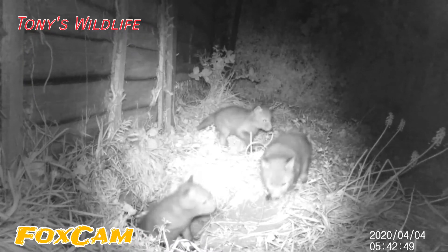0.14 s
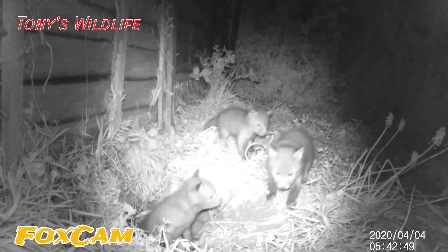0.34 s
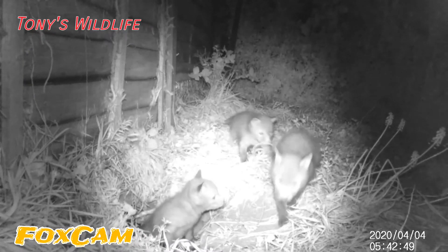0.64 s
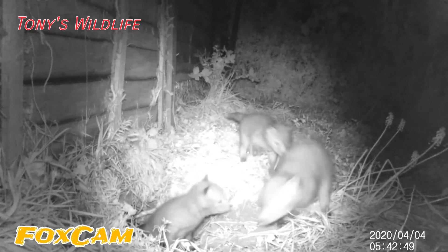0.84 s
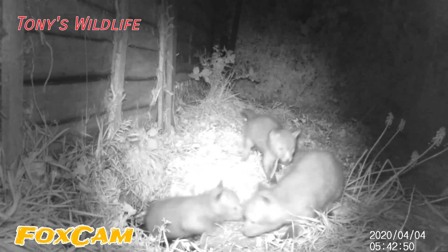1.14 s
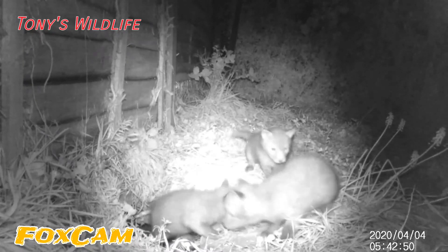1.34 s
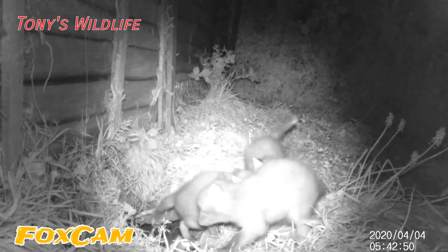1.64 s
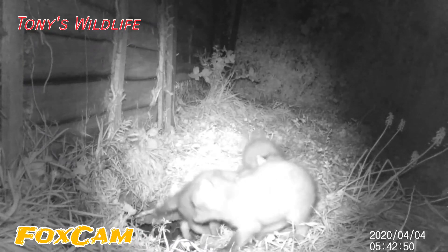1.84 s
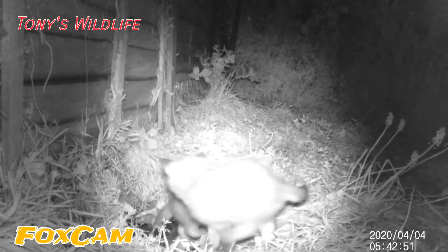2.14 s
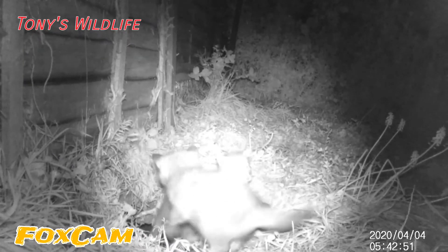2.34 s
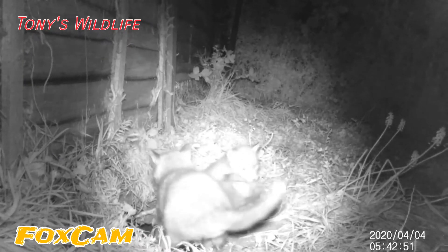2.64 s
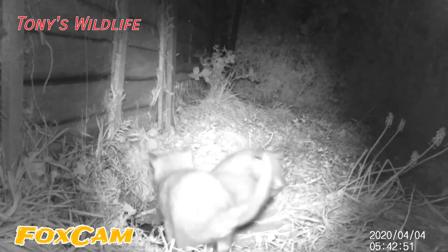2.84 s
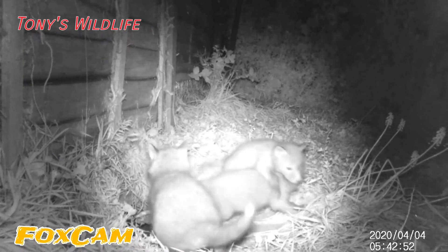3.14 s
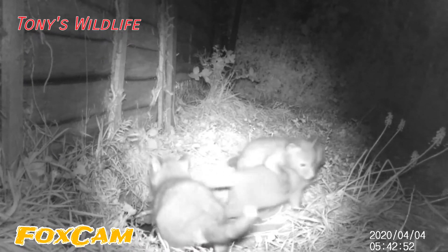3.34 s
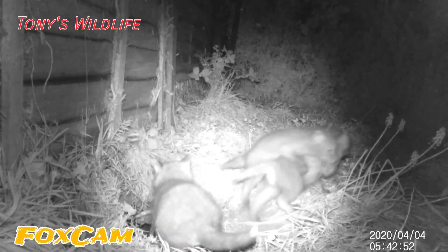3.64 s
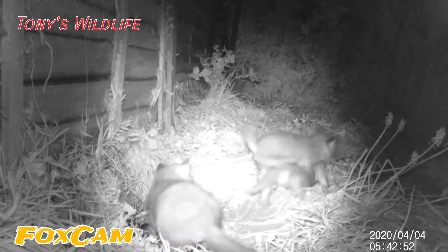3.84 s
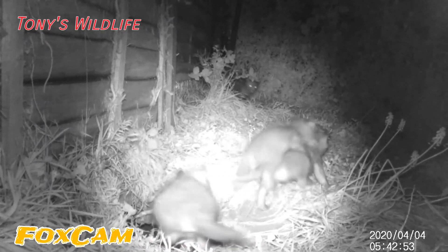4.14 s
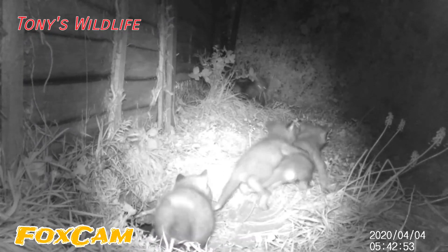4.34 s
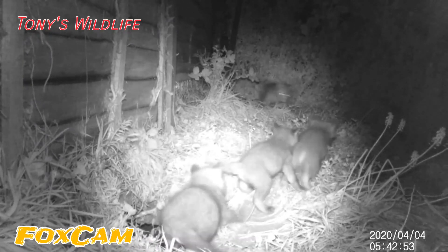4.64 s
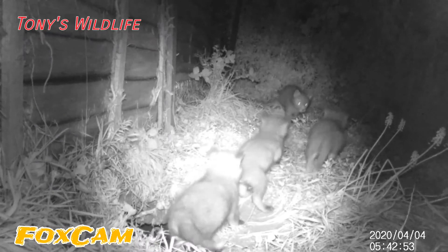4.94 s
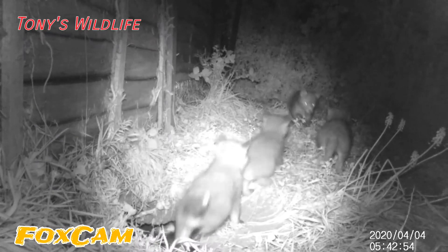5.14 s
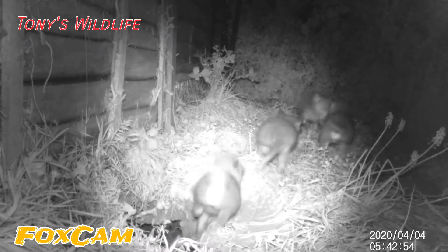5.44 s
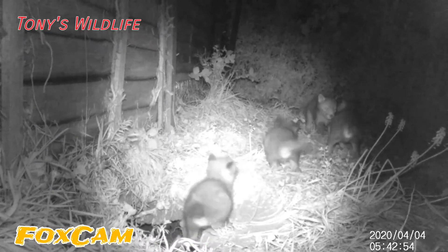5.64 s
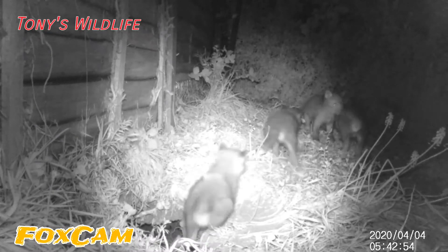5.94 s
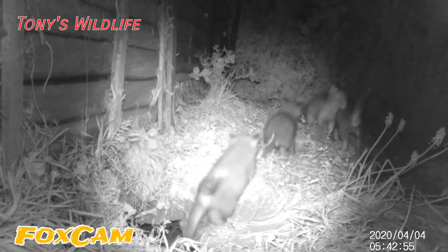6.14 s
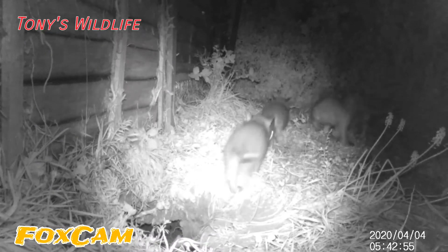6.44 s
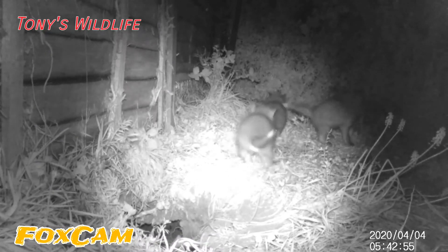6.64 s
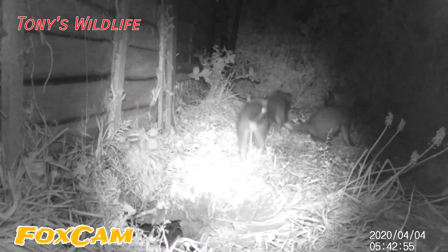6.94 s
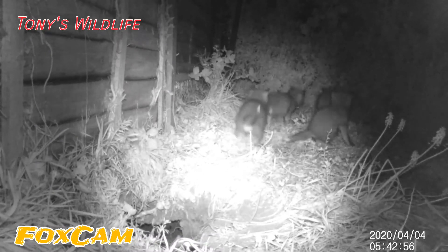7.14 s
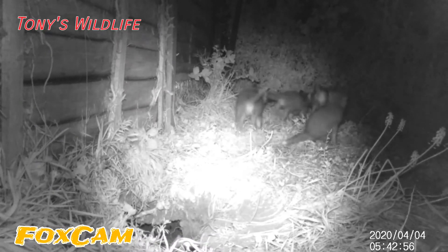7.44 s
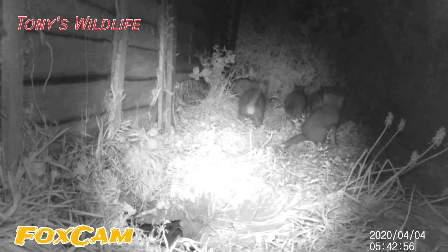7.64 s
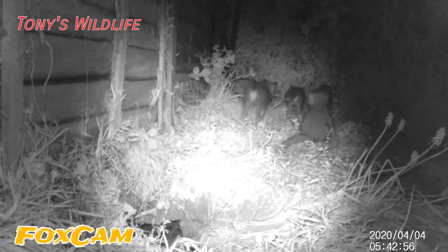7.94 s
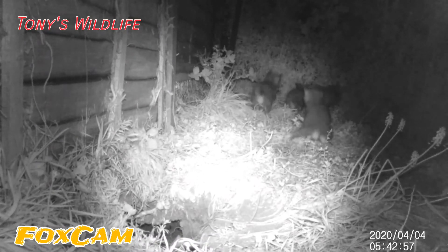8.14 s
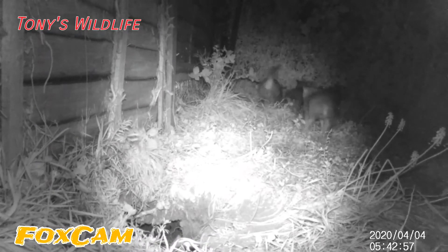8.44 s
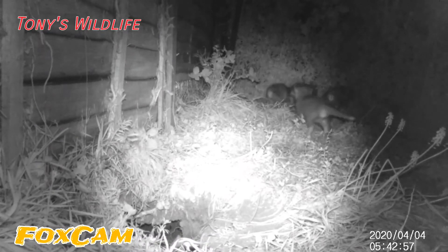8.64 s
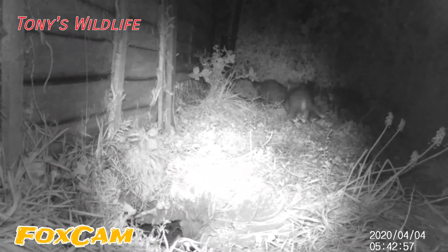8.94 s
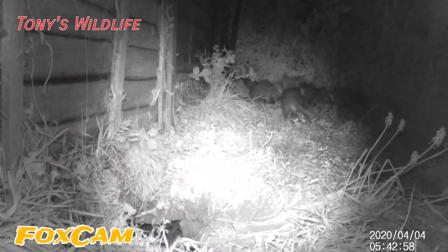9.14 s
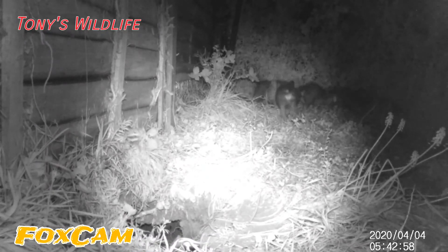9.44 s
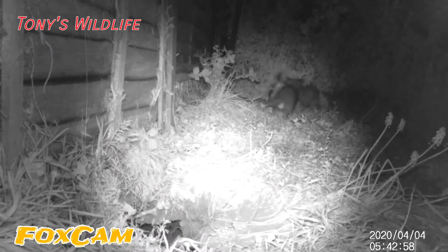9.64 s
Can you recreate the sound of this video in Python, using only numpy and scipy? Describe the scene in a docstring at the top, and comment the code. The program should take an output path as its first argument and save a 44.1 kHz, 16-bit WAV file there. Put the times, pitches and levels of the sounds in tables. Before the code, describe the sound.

Faint echoing birdsong at dawn, a clear trill early on, twig snaps, then piercing close chirps and warbles, recorded on a small rough outdoor microphone.

```python
"""Dawn chorus in a garden.

A songbird close by whistles with both sides of its syrinx as gliding sines; a thrush flutes lower and farther off.
Small birds whistle, trill and rattle; noise modulation makes notes hoarse, and many faint whistles form a chorus.
Twigs snap as decaying sines over filtered-noise straw, traffic and hiss; noise tails echo off hedges and fences.
A small outdoor camera samples slowly, cuts steeply above 5.25 kHz, and its playback gain bends the peaks."""
import sys
import numpy as np
from scipy import signal
from scipy.fft import rfft, irfft, next_fast_len
from scipy.io import wavfile
from scipy.ndimage import uniform_filter1d, map_coordinates

SR = 44100
rng = np.random.default_rng(int(sys.argv[2]) if len(sys.argv) > 2 else 0)


def transcribe(signal):
    """Save signal, clipped to [-1, 1], as a 16-bit WAV file at the path in sys.argv[1]."""
    frames = np.atleast_2d(signal).T
    limited = np.clip(frames, -1, 1)
    pcm = np.round(limited * 32767).astype(np.int16)
    wavfile.write(sys.argv[1], SR, pcm)


N = 431738  # samples

# Near singer, one glide a row; overlapping rows are the two sides of its syrinx:
# t/s, length/s, first f/Hz, middle f/Hz, last f/Hz, level/dB, swell start to end/dB
NEAR_NOTES = [ (5.2, 0.026, 5440, 5200, 4640, -22, 8.5), (5.228, .037, 4315, 4016, 4200, -13, -6),
              (5.266, 0.015, 4170, 4030, 3580, -17, 7), (5.279, 0.011, 3750, 3433, 3340, -8.5, -8.5),
              (5.343, .044, 4905, 4494, 4750, -7, 11), (5.387, 0.012, 4420, 3910, 3650, -4.5, -1.5),
              (5.396, 0.034, 3715, 3423, 3294, -4, -5), (5.478, 0.0073, 4720, 4340, 4100, -17, 6.5),
              (5.486, .043, 4136, 4070, 3950, -8.5, -16.5), (5.526, 0.026, 3930, 3900, 3890, -10, 0),
              (5.569, 0.033, 4080, 3460, 3680, -11, 0.5), (5.602, 0.17, 3810, 3733, 3670, -28, 0),
              (6.038, .052, 3460, 3400, 3390, -22.5, 0), (6.09, 0.11, 3376, 3430, 3400, -21.5, 2.5),
              (6.222, .016, 3430, 3360, 3190, -28.5, 0), (6.3, 0.12, 3483, 3420, 3415, -21, -3.5),
              (6.424, .016, 3410, 3330, 3170, -30.5, 0), (6.62, 0.016, 3900, 3685, 3520, -10.5, 20),
              (6.634, 0.0097, 3970, 4080, 4280, -9.5, -5.5), (6.644, 0.021, 3465, 3615, 3420, -9.5, -1.5),
              (6.648, 0.012, 4290, 4450, 4430, -9, 5.5), (6.666, 0.015, 4290, 4250, 4220, -14.5, -9.5),
              (6.661, 0.026, 3500, 3420, 3830, -15, 7), (6.682, 0.019, 3924, 3690, 3680, -4, -6),
              (6.718, 0.023, 3810, 3650, 3470, -8.5, 5), (6.744, .062, 3380, 3410, 3620, -12.5, 0),
              (6.747, 0.066, 4290, 4040, 4150, -10.5, -6), (6.805, 0.037, 3820, 3607, 3720, -12.5, -7.5),
              (7.092, 0.027, 3380, 3970, 4210, -12.5, 11), (7.11, 0.035, 2800, 3410, 4020, -12, 28),
              (7.142, 0.015, 3630, 3730, 4470, -8, -9), (7.198, .017, 2920, 3170, 3520, -16.5, 11),
              (7.211, 0.03, 3345, 3510, 3120, 0, -12.5), (7.246, 0.0082, 3370, 2975, 2830, -23, -9),
              (7.309, 0.013, 3990, 4105, 4310, -12.5, 6.5), (7.313, .028, 2740, 3406, 3710, -12, 25),
              (7.341, 0.036, 3880, 3750, 3675, -10, 1.5), (7.428, 0.017, 3770, 4150, 4440, -14.5, -2),
              (7.434, 0.037, 2850, 3544, 4190, -8.5, 24.5), (7.468, 0.03, 3974, 4044, 4120, -9, 3.5),
              (7.49, .011, 4370, 4600, 4840, -9.5, -5.5), (7.517, 0.021, 2980, 3080, 3100, -24, 0)]
# Its husky mutter after loud notes, same columns: t/s, length/s, three f/Hz, level/dB, swell/dB
MUTTER_NOTES = [(6.44, .185, 3380, 3330, 3267, -35, 0.5), (6.84, .062, 3276, 3250, 3150, -29.5, 1.5),
                (6.846, .06, 3890, 3870, 3845, -21, -7.5), (6.908, .12, 3755, 3854, 3515, -28.5, 0),
                (6.918, 0.098, 3350, 3087, 3050, -33.5, -4), (7.535, .155, 3446, 3680, 3680, -28.5, -8.5),
                (7.55, 0.2, 4023, 4177, 4275, -25, -8), (7.73, 0.055, 4280, 4110, 4290, -28.5, -5.5)]


def near():
    """The harder the bird sings, the more its tone breaks into quick lobes; the mutter is husky and hazier."""
    loud = singer(glides(NEAR_NOTES, arch_db=3.0), edge_s=0.0029, flutter_db=0.83, flutter_hz=220)
    effort = uniform_filter1d(np.abs(loud), size=300)
    loud = loud * amp(-2.5 * effort * wobble(210) ** 2)
    soft = singer(glides(MUTTER_NOTES, arch_db=0.0), edge_s=0.0031, flutter_db=2.2, flutter_hz=130)
    soft = burr(soft, share=0.29, rate_hz=350)
    loud = echoes(bent(loud, share=0.03), early_db=-9.0, early_t60_s=0.1, late_db=-17.5, late_t60_s=0.8)
    soft = echoes(bent(soft, share=0.089), early_db=-2.5, early_t60_s=0.12, late_db=-13.5, late_t60_s=1.0)
    return loud + soft


# Thrush glides: t/s, length/s, first f/Hz, middle f/Hz, last f/Hz, level/dB, swell start to end/dB
THRUSH_NOTES = [ (.02, .24, 1865, 2760, 3440, -49.5, -13), (1.89, .13, 2250, 2390, 2240, -46, 4.5),
                (2.11, .18, 1746, 1857, 1986, -38.5, 8.5), (2.16, .084, 2720, 2784, 2770, -43, 0),
                (2.63, .09, 2336, 2329, 2187, -31, 0.5), (2.905, 0.099, 1744, 2025, 2230, -35.5, 9),
                (2.975, .165, 2188, 2284, 2124, -28, 0.5), (3.575, 0.18, 1900, 1970, 1910, -43.5, -5),
                (3.66, 0.1, 2310, 2296, 2240, -41, -16), (5.13, 0.072, 1926, 1932, 1995, -45, 1.5),
                (6.09, 0.11, 2110, 2153, 2114, -46, -8), (7.12, .105, 1995, 1997, 2120, -43.5, 5.5),
                (7.36, .15, 1960, 1905, 1853, -40.5, 11), (7.57, .065, 2400, 2530, 2580, -46.5, 4),
                (7.58, 0.048, 1866, 1920, 1930, -36.5, 4), (7.775, .11, 1990, 1975, 2090, -33, 10.5),
                (7.925, .16, 2406, 2096, 1863, -31.5, 0), (8.28, 0.061, 2510, 2380, 2182, -30, 22),
                (8.52, 0.17, 1906, 1970, 2175, -46.5, 0), (8.73, 0.43, 1947, 1962, 2067, -44.5, -8),
                (9.0, .085, 2517, 2530, 2350, -37, -6.5), (9.1, 0.093, 2173, 2760, 3330, -39.5, -4),
                (9.2, 0.11, 3296, 3436, 3500, -40, -16)]


def thrush():
    """Fluted notes with a slight burr, heard over many paths."""
    voice = singer(glides(THRUSH_NOTES, arch_db=1.0), edge_s=0.0029, flutter_db=0.94, flutter_hz=70)
    voice = burr(voice, share=0.28, rate_hz=220)
    return echoes(voice, early_db=1.8, early_t60_s=0.072, late_db=-3.9, late_t60_s=0.8)


# Hoarse glides: t/s, length/s, first f/Hz, middle f/Hz, last f/Hz, level/dB, swell start to end/dB
HOARSE_NOTES = [ (2.355, 0.078, 2630, 2294, 2174, -35.5, 3), (2.39, 0.172, 2000, 1912, 1820, -42, -1),
                (2.555, .08, 2330, 2337, 2280, -36, 2), (3.135, .105, 2170, 1890, 1510, -38, -12),
                (4.03, 0.16, 2050, 2063, 2165, -51, -2), (3.845, 0.056, 3890, 3380, 3130, -43.5, -8),
                (3.905, 0.045, 2730, 2500, 2400, -39, 3), (3.945, .11, 3900, 3690, 3650, -48, -2),
                (4.07, 0.066, 4070, 3730, 3530, -42.5, 1), (4.12, 0.053, 3830, 4430, 4590, -42.5, 8),
                (4.175, .1, 3750, 4040, 4430, -47, 0), (4.44, .07, 4120, 3910, 3560, -47, -1.5),
                (7.97, 0.067, 3730, 3970, 3850, -47, 0), (8.215, 0.071, 3630, 4120, 4260, -53, -9),
                (7.55, 0.28, 2320, 2614, 2550, -47, 7), (7.64, 0.079, 2020, 1970, 1900, -39, -5),
                (8.025, .115, 4510, 3950, 4200, -45, -1.5), (8.36, 0.099, 1695, 1630, 1675, -41.5, -6),
                (9.5, 0.28, 2430, 2396, 2510, -41, 3)]


def hoarse():
    """Buzzy notes, shaken by narrow noise, in deep echo."""
    voice = singer(glides(HOARSE_NOTES, arch_db=-2.5), edge_s=0.0091, flutter_db=1.5, flutter_hz=60)
    voice = burr(voice, share=0.65, rate_hz=400)
    return echoes(voice, early_db=1.8, early_t60_s=0.13, late_db=-1.3, late_t60_s=1.0)


# Small-bird glides, with two clean, level thrush whistles at 4.385 s and 4.54 s: t/s, length/s, first f/Hz,
# middle f/Hz, last f/Hz, level/dB, swell start to end/dB
SMALL_NOTES = [ (.35, .2, 4560, 4320, 4710, -45, 6.5), (.67, 0.046, 4240, 4210, 3920, -43, -5),
               (.87, .04, 5400, 5470, 5330, -45.5, 3), (1.163, 0.047, 5400, 5300, 5160, -46, -0.5),
               (1.128, 0.035, 3240, 3090, 3350, -43, 1), (1.169, 0.013, 3390, 3450, 3550, -37.5, 1.5),
               (1.228, 0.029, 3500, 3460, 3110, -40.5, 1.5), (1.297, .022, 3365, 3920, 4950, -40, -10),
               (1.322, 0.025, 3950, 3410, 3030, -44, 2), (1.428, .02, 3050, 3430, 3540, -45, 1),
               (1.63, .02, 4350, 4890, 5140, -28, -3.5), (1.65, 0.027, 4610, 4070, 4040, -24, -8),
               (1.69, 0.0092, 4420, 4230, 3690, -20.5, -2.5), (2.34, 0.047, 4020, 3830, 3850, -40, 0),
               (2.585, 0.055, 3600, 3480, 3440, -48, -10), (2.675, .095, 3780, 3600, 3800, -48, 5),
               (2.788, 0.029, 3900, 3650, 3100, -43, -8), (2.97, 0.2, 4210, 4105, 4370, -53, 0),
               (2.848, .025, 3450, 3530, 3850, -38, -7.5), (3.83, .012, 3370, 3860, 4210, -45, 9),
               (4.385, .075, 2670, 2710, 2690, -54.5, 1), (4.54, .105, 2680, 2660, 2670, -54, 2),
               (8.585, 0.067, 4565, 4720, 4740, -42.5, -11.5), (9.058, .085, 4010, 4040, 4060, -42, 3),
               (9.665, 0.083, 3730, 3870, 3855, -42, -1.5), (9.66, .045, 5030, 4750, 4490, -37.5, 2)]


def small_birds():
    """Short whistles farther off, strongly fluttering and lightly burred."""
    voice = singer(glides(SMALL_NOTES, arch_db=1.5), edge_s=0.0013, flutter_db=3.6, flutter_hz=150)
    voice = burr(voice, share=0.17, rate_hz=300)
    return echoes(voice, early_db=-6, early_t60_s=0.1, late_db=-8, late_t60_s=0.8)


# Trills: syllable [(t from its start/s, f/Hz)], (level/dB, swell start to end/dB, sweep shrink by the end/share),
# run (t/s, length/s, first gap/s, gap growth per repeat/s)
TRILL_RUNS = [([(0, 4000), (.009, 4640), (.022, 3720), (.034, 3340)], (-29, -10, .2),
              (1.71, .6, .0735, .0024)), ([(0, 2400), (.009, 2700), (.022, 5399)], (-40, 6, 0),
              (8.472, .07, .025, .005))]
# Rattles, same columns: syllable [(t/s, f/Hz)], (level/dB, swell/dB, shrink/share), run (four times/s)
RATTLE_RUNS = [([(0, 3795), (.015, 4905), (.024, 4005), (.035, 2612)], (-38, -4, .2),
               (3.41, .26, .07, .0025)), ([(0, 5100), (.012, 4650), (.03, 3600)], (-40, -1.5, .25),
               (9.328, .24, .044, 0))]


def trills():
    """Clear repeated syllables, and rattles that wide noise tears into a rasp."""
    clear = singer(repeated(TRILL_RUNS), edge_s=0.0024, flutter_db=0.9, flutter_hz=260)
    rasp = singer(repeated(RATTLE_RUNS), edge_s=0.004, flutter_db=3, flutter_hz=300)
    rasp = burr(rasp, share=0.6, rate_hz=1200)
    clear = echoes(clear, early_db=-2.9, early_t60_s=0.1, late_db=-9, late_t60_s=0.78)
    return clear + echoes(rasp, early_db=5, early_t60_s=0.09, late_db=0, late_t60_s=0.6)


# Birds too far to tell apart: t/s, level/dB
CHORUS_LEVEL = [(0, -60.5), (3, -44), (5, -62), (7.5, -49.5), (9.8, -55)]


def chorus():
    """Very many thin, nearly level whistles, mostly low, blurred and mostly echo."""
    notes = []
    for start, pitch, soft, glide in rng.random((800, 4)):
        t = start * (N / SR - 0.2)
        hz = 1800 + 2600 * pitch ** 3
        db = -6 * soft
        end = t + 0.03 + 0.14 * glide ** 2
        notes.append([(t, hz, db), (end, hz * (0.95 + 0.1 * glide), db)])
    voices = burr(singer(notes, edge_s=0.01, flutter_db=2, flutter_hz=60), share=0.35, rate_hz=250)
    distant = echoes(voices, early_db=5, early_t60_s=0.15, late_db=7, late_t60_s=0.9)
    return amp(curve(CHORUS_LEVEL)) * unit(distant)


# Dry twigs: t/s, peak level/dB, f/Hz
TWIG_SNAPS = [(2.077, -20.5, 5170), (5.064, -22.5, 5140), (5.817, -22.5, 1457)]


def ticks():
    """Snaps of dry twigs, decaying 5.8 dB a cycle, over a faint, clumped crackle of straw."""
    out, t = np.zeros(N), np.arange(400) / SR
    for s, db, hz in TWIG_SNAPS:
        first = round(s * SR)
        out[first:first + len(t)] = amp(db - 5.8 * hz * t) * np.sin(2 * np.pi * hz * t)
    clumps_db = 2.5 * wobble(8) + 5.5 * wobble(200)
    grains = rng.standard_normal(N) * amp(clumps_db)
    straw = filtered(grains, lambda f: 1 / (1 + ((f - 5000) / 900) ** 2))
    return out + amp(-58.5) * unit(straw)


# Spectrum of traffic and camera hiss: f/Hz, relative level per Hz/dB
AIR_SPECTRUM = [(20, -0.5), (40, -2), (58, 3), (90, -1.5), (270, -8), (520, -13.5), (740, -8.5),
                (1060, -11.5), (1540, -19.5), (2140, -17), (2830, -22.5), (4970, -27), (5510, -35.5)]
# Its swell: t/s, level/dB
AIR_SWELL = [(0, -38), (8, -38), (9.8, -37)]


def air():
    """Coloured noise that swells towards the end, and a faint wavering hum."""
    hz, db = np.transpose(AIR_SPECTRUM)
    noise = filtered(rng.standard_normal(N), lambda f: amp(np.interp(np.log(f + 1), np.log(hz + 1), db)))
    hum_hz = 268 + 9 * wobble(0.51)
    hum = amp(-52.5) * np.sin(2 * np.pi * np.cumsum(hum_hz) / SR)
    return amp(curve(AIR_SWELL)) * unit(noise) + hum


def singer(notes, edge_s, flutter_db, flutter_hz):
    """A bird's notes; its breath and the moving air make them flutter."""
    out = np.zeros(N)
    for note in notes:
        add(out, note, edge_s)
    return out * amp(flutter_db * wobble(flutter_hz))


def add(out, note, edge_s):
    """One syrinx note: a gliding sine with soft ends."""
    s, hz, db = np.transpose(note)
    first = round(s[0] * SR)
    t = np.arange(first, min(round(s[-1] * SR), N)) / SR
    ends = np.clip(np.minimum(t - s[0], s[-1] - t) / edge_s, 0, 1)
    turns = np.cumsum(np.interp(t, s, hz)) / SR + rng.random()
    level = np.sqrt(2) * ends * amp(np.interp(t, s, db))  # sqrt 2: levels are rms
    out[first:first + len(t)] += level * np.sin(2 * np.pi * turns)


def glides(rows, arch_db):
    """Notes bent through three pitches; both ends sink by arch_db (rise if it is negative)."""
    u = np.linspace(0, 1, num=9)
    notes = []
    for s, length, first, middle, last, db, swell_db in rows:
        bow = 2 * (first + last - 2 * middle) * (u - 0.5) ** 2
        hz = middle + (last - first) * (u - 0.5) + bow
        level = db + swell_db * (u - 0.5) - arch_db * np.abs(2 * u - 1) ** 3
        notes.append(np.transpose([s + length * u, hz, level]))
    return notes


TURN_DIP_DB = 1.5  # a syllable is fainter at its highest pitch
RUN_ARCH_DB = 4.5  # a run is softer at its ends


def repeated(phrases):
    """A syllable repeated at steady or slowly widening gaps, each a little different in pitch."""
    notes, k = [], np.arange(12)
    for syllable, (db, swell_db, shrink), (start, length, gap, grows) in phrases:
        at, hz = np.transpose(syllable)
        top = hz.max()
        times = gap * k + grows * k * (k - 1) / 2
        bends = 1 + 0.01 * rng.standard_normal(len(k))
        for u, bend in zip(times / length, bends):  # u: progress through the run
            if u < 1:
                run_db = db + swell_db * (u - 0.5) - RUN_ARCH_DB * (2 * u - 1) ** 2
                pitch = bend * (hz + shrink * u * (top - hz))
                notes.append(np.transpose([start + u * length + at, pitch, run_db - TURN_DIP_DB * (hz == top)]))
    return notes


def burr(x, share, rate_hz):
    """Narrow noise shakes a whistle and widens its line."""
    return x * (1 - share + share * wobble(rate_hz))


def bent(voices, share):
    """Two voices in one throat bend each other: a cubic adds weak side tones."""
    size = np.sqrt(np.abs(uniform_filter1d(voices ** 2, size=300))) + 1e-4
    cubic = share * voices ** 3 / size ** 2
    return voices - filtered(cubic, lambda f: (f / 4000) ** 3 * (f < 6500))


def echoes(x, early_db, early_t60_s, late_db, late_t60_s):
    """Direct sound, quick scatter off hedge and fence, and the long tail of the gardens."""
    t = np.arange(SR) / SR
    decay = amp(-60 * t / [[early_t60_s], [late_t60_s]])
    early, late = rng.standard_normal((2, SR)) * decay * (t > 0.003)
    tail = amp(early_db) * early / np.linalg.norm(early) + amp(late_db) * late / np.linalg.norm(late)
    return x + signal.fftconvolve(x, tail)[:N]


def amp(db):
    """Gain of a dB value."""
    return 10 ** (np.asarray(db) / 20)


def unit(x):
    """x at rms 1."""
    return x / np.sqrt(np.mean(x ** 2) + 1e-20)


def curve(rows):
    """(s, value) rows as one value per sample."""
    return np.interp(np.arange(N) / SR, *np.transpose(rows))


def wobble(rate_hz):
    """A smooth random curve with rate_hz knots a second."""
    knots = rng.standard_normal(int(N * rate_hz / SR) + 4)
    return map_coordinates(knots, [np.arange(N) * rate_hz / SR])


def filtered(x, response):
    """x times a response of frequency."""
    m = next_fast_len(N + SR // 2)
    return irfft(rfft(x, m) * response(np.fft.rfftfreq(m, 1 / SR)), m)[:N]


def scene():
    """All singers in their echoes, over twigs, straw and air."""
    birds = near() + thrush() + hoarse() + small_birds() + trills() + chorus()
    return (birds + ticks() + air())[None]


CAMERA_HZ, EDGE_HZ, TOP_HZ = 11025, 5250, 15650  # sampling rate, start of steep cut, final cutoff


def record(dry):
    """Slow sampling mirrors the top of the band; a limiter holds peaks; a faint third harmonic grows after them."""
    x = filtered(dry[0], lambda f: f < CAMERA_HZ / 2)
    x = x + 2 * x * np.cos(2 * np.pi * CAMERA_HZ * np.arange(N) / SR)  # mirror image
    x = filtered(x, lambda f: amp(-np.clip((f - EDGE_HZ) / 130, 0, 14) ** 2))
    size = np.abs(signal.hilbert(x, next_fast_len(N))[:N])
    hot = uniform_filter1d(size, size=500) > 0.6
    heat = signal.lfilter([1], [1, -np.exp(-1 / (0.05 * SR))], hot)  # fades over 50 ms
    strain = 0.2 + np.tanh(heat / (0.005 * SR))
    x = x / (1 + size ** 8) ** (1 / 8)  # limiter
    x = 1.07 * x - 0.12 * strain * x * np.abs(x)
    x = x + amp(-92) * rng.standard_normal(N)
    return filtered(x, lambda f: f < TOP_HZ)[None]


dry = scene()
out = record(dry)
transcribe(out)
```